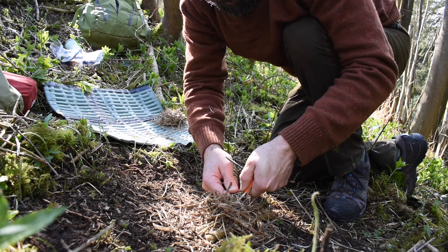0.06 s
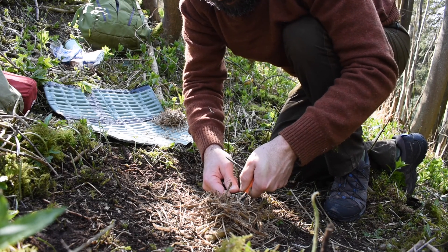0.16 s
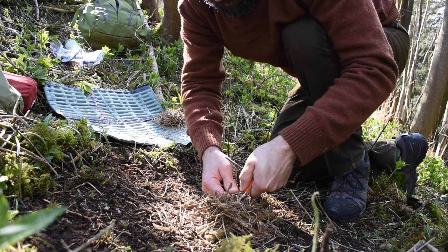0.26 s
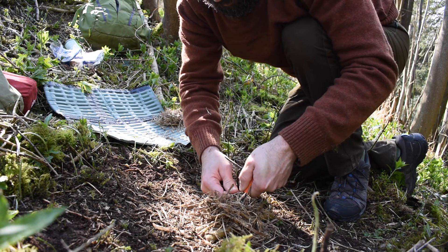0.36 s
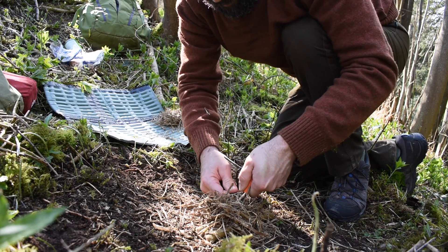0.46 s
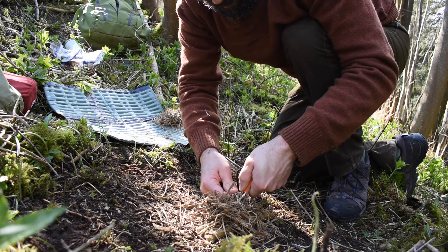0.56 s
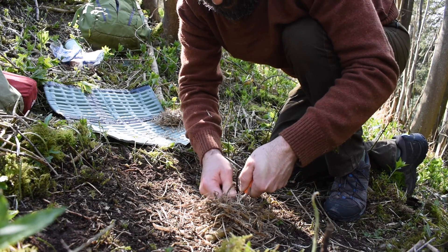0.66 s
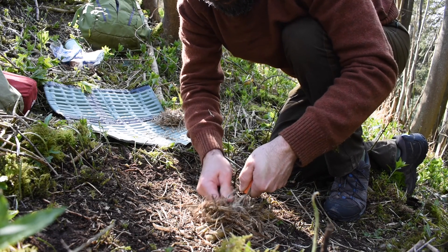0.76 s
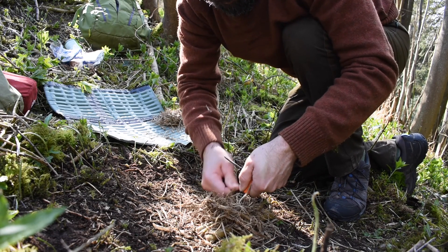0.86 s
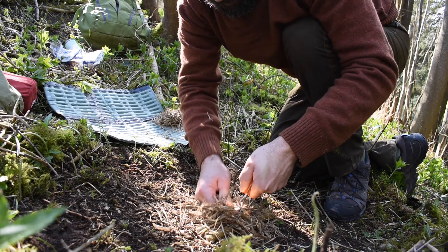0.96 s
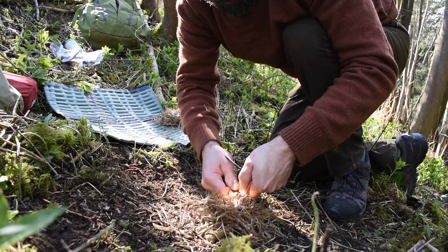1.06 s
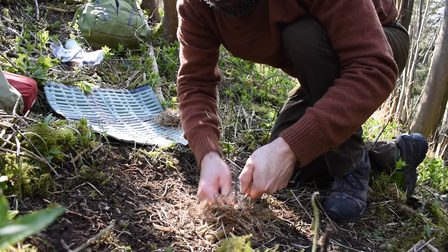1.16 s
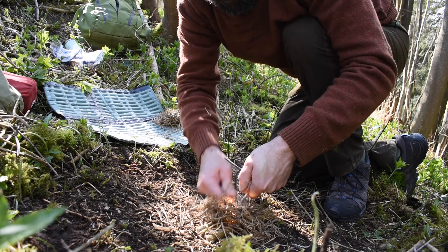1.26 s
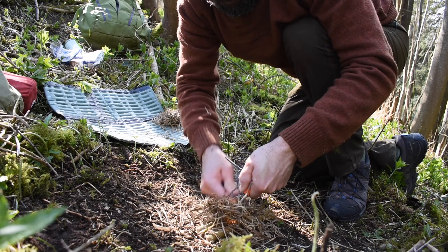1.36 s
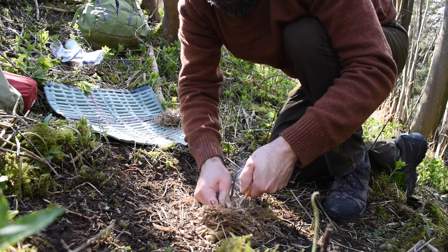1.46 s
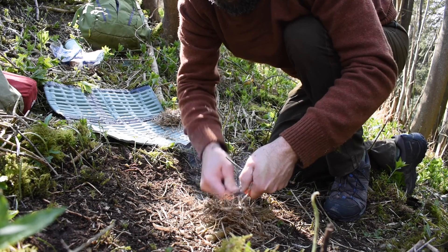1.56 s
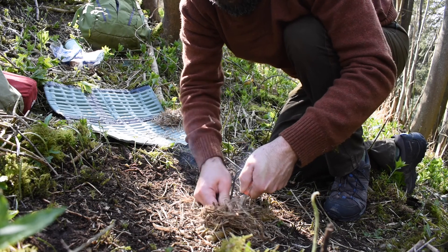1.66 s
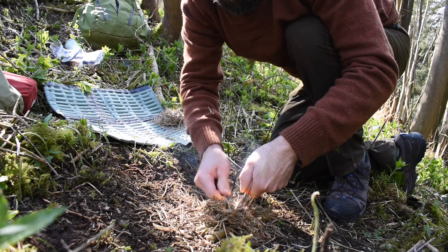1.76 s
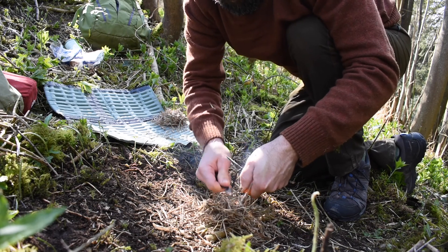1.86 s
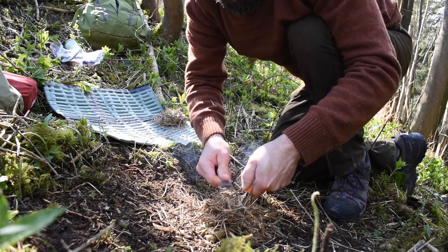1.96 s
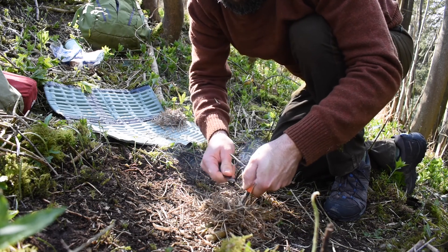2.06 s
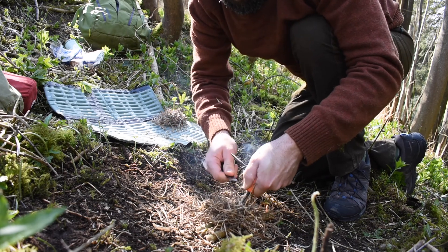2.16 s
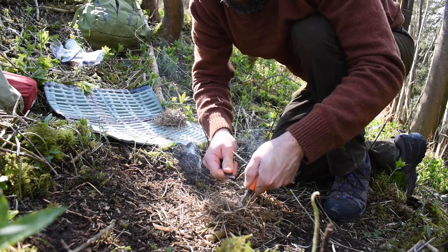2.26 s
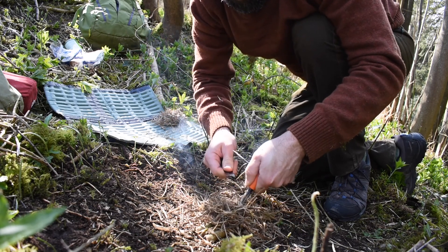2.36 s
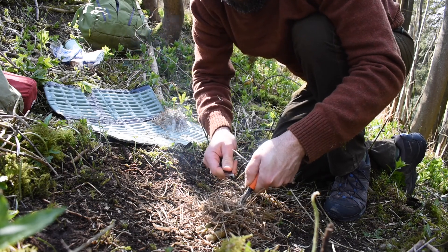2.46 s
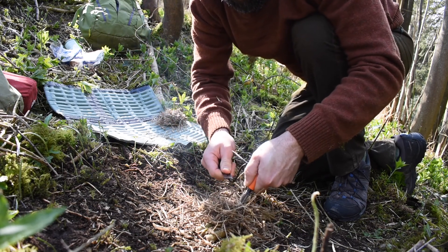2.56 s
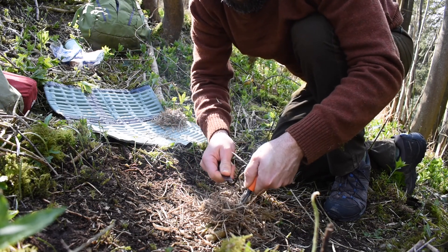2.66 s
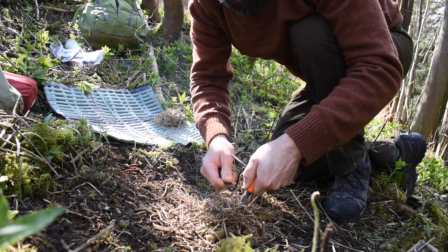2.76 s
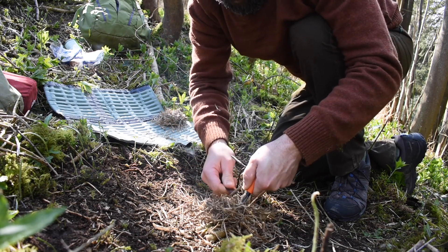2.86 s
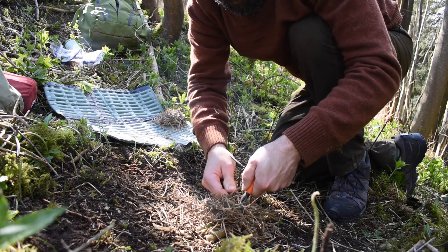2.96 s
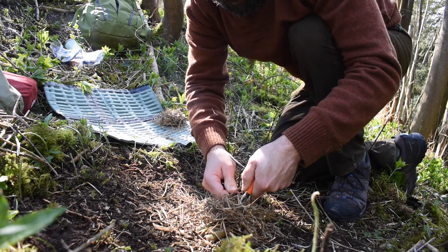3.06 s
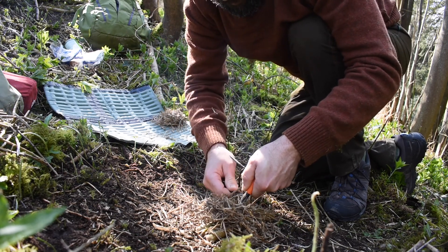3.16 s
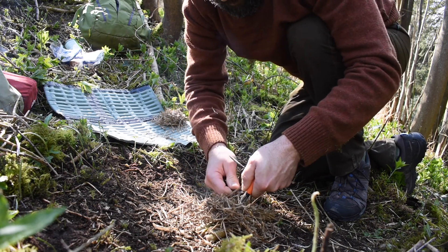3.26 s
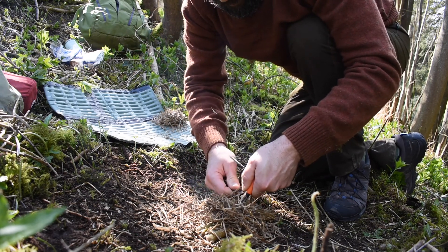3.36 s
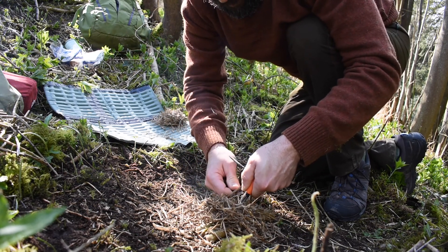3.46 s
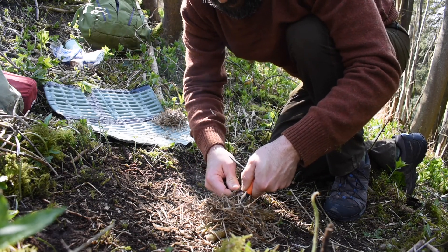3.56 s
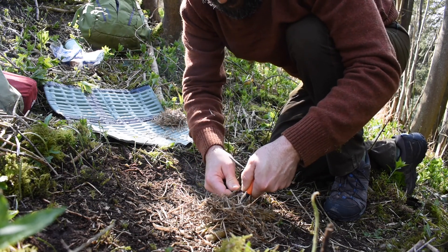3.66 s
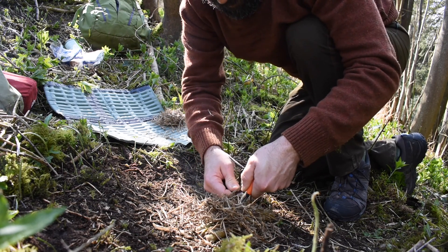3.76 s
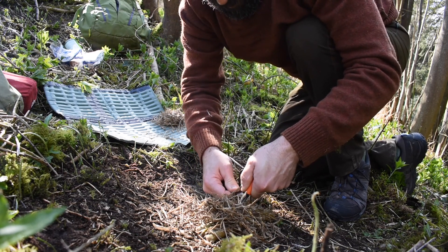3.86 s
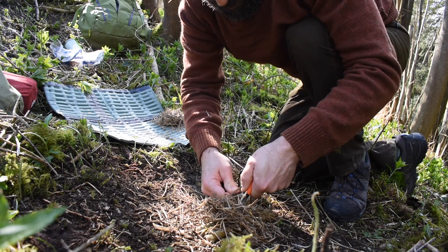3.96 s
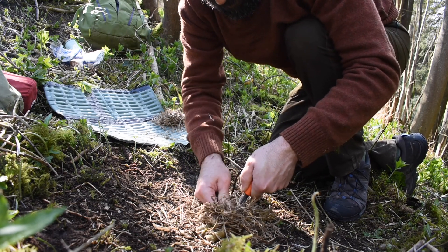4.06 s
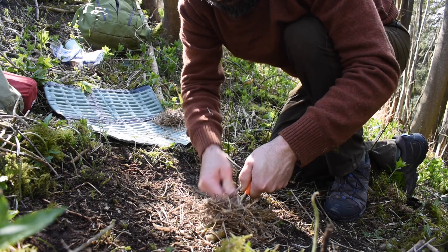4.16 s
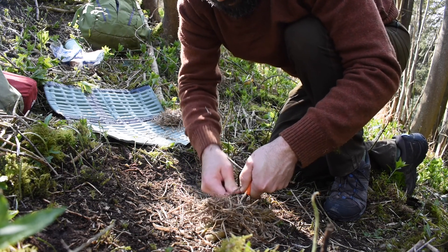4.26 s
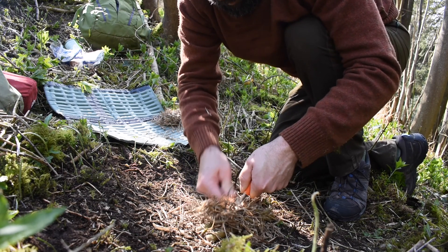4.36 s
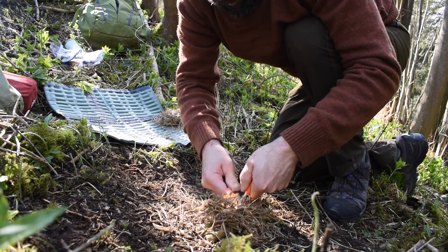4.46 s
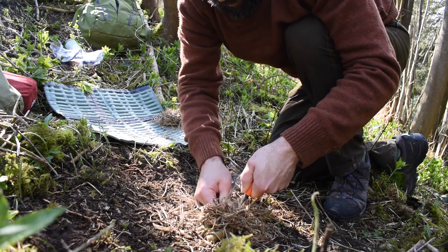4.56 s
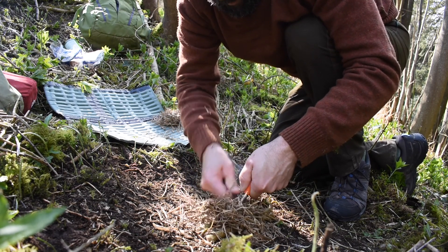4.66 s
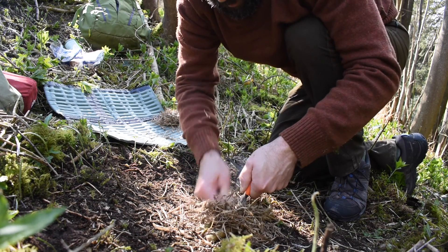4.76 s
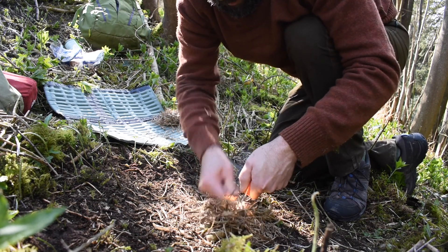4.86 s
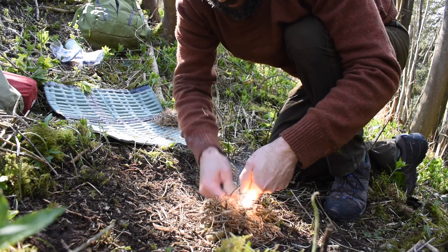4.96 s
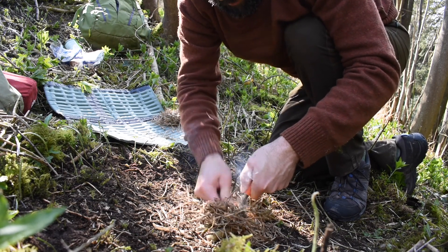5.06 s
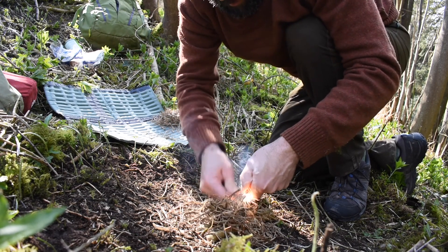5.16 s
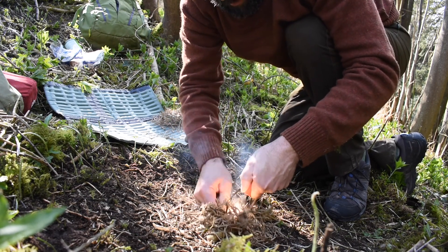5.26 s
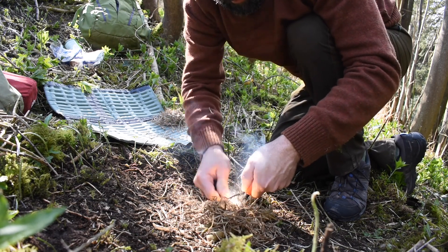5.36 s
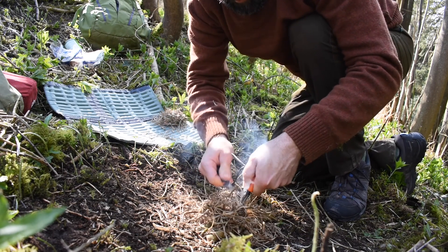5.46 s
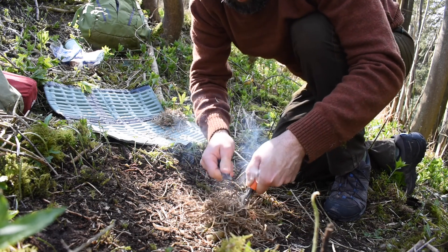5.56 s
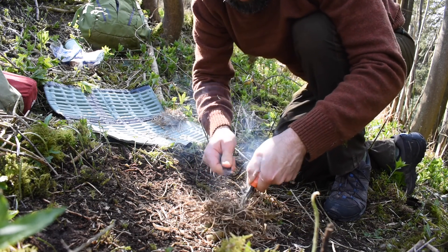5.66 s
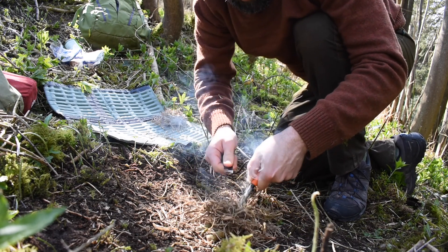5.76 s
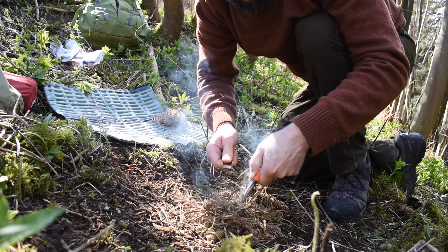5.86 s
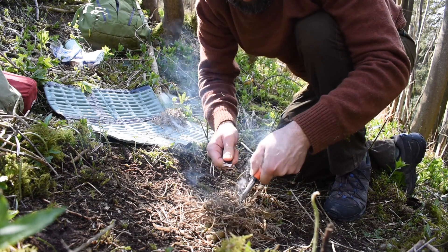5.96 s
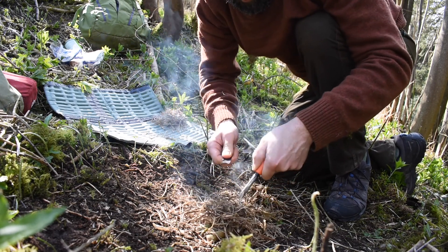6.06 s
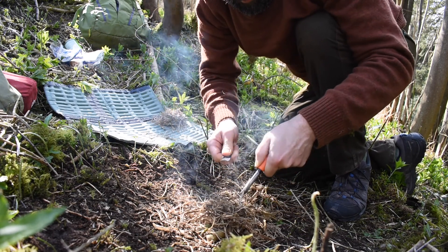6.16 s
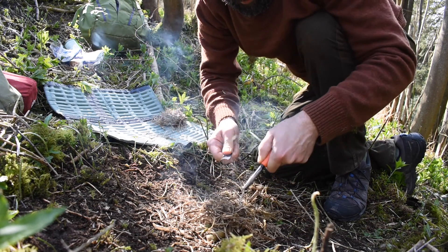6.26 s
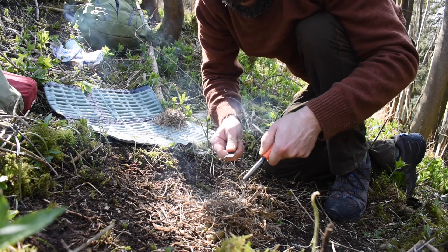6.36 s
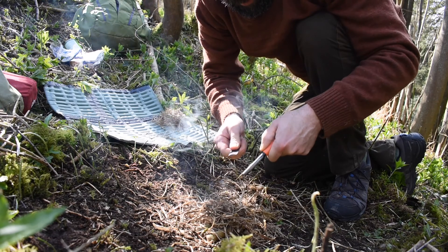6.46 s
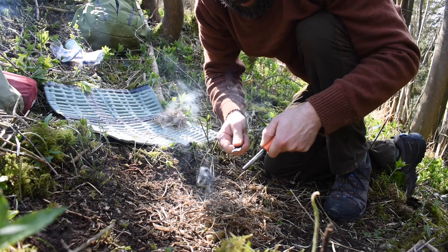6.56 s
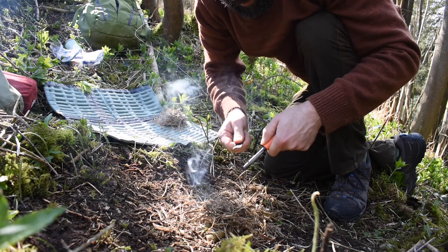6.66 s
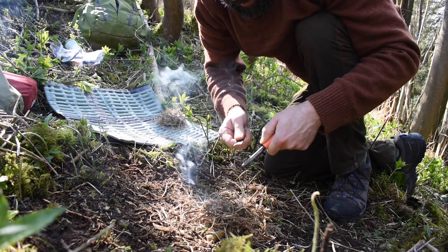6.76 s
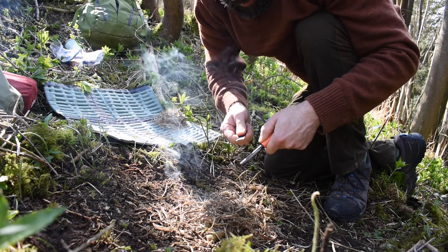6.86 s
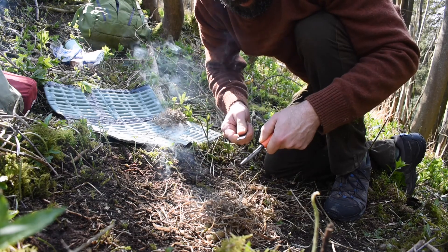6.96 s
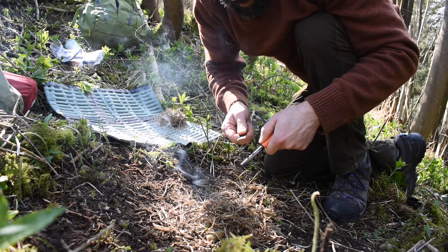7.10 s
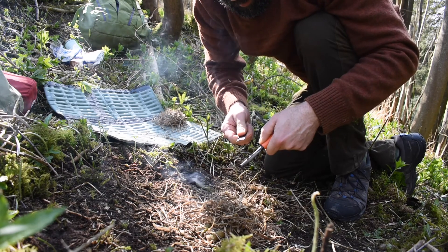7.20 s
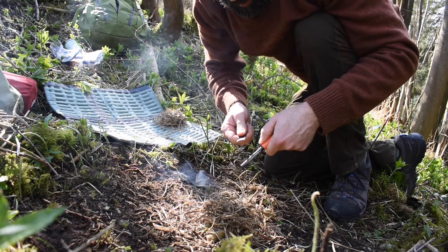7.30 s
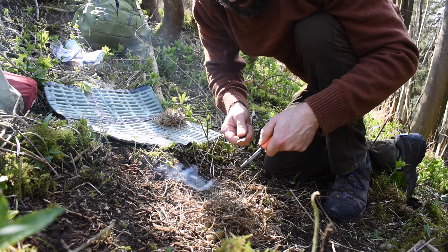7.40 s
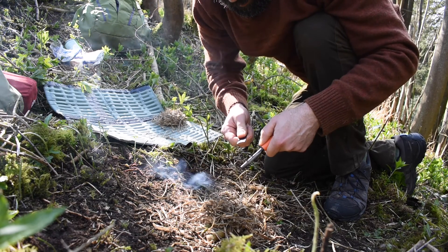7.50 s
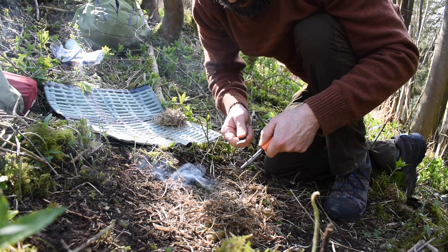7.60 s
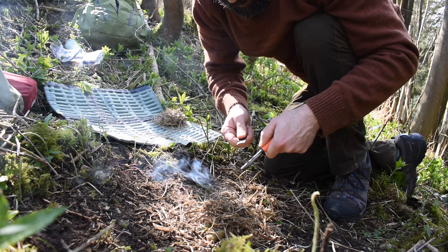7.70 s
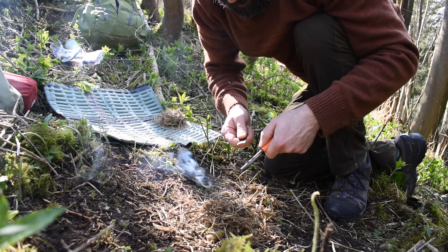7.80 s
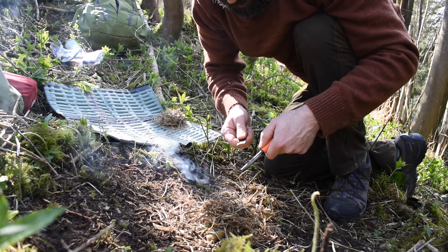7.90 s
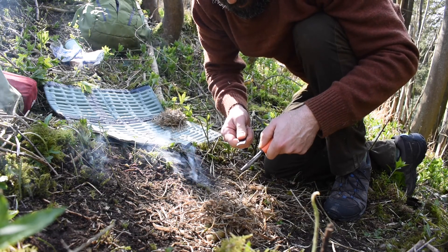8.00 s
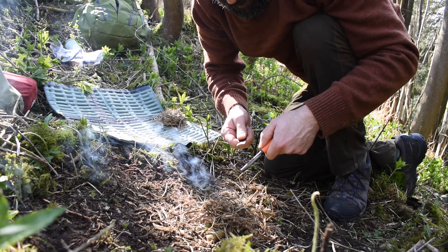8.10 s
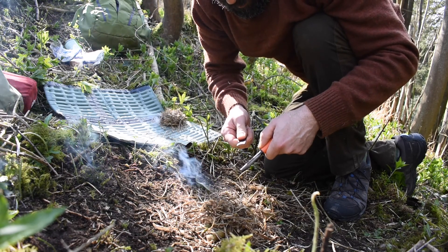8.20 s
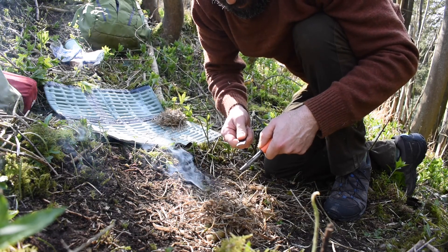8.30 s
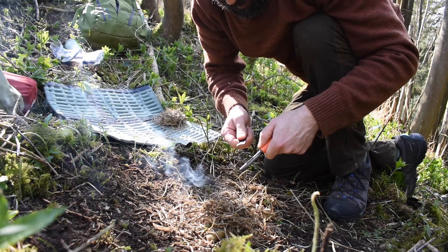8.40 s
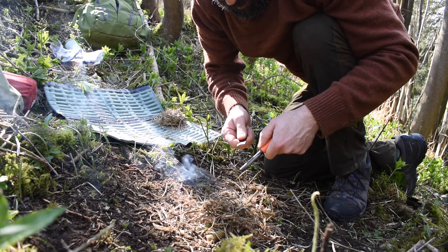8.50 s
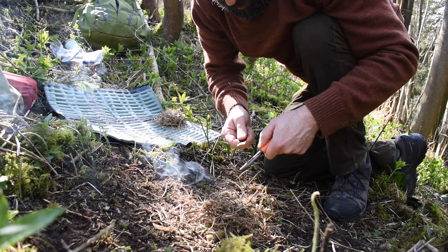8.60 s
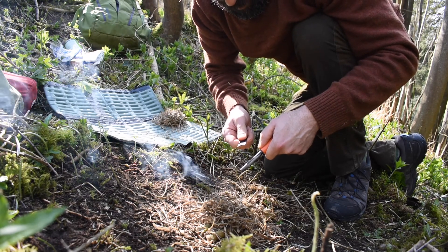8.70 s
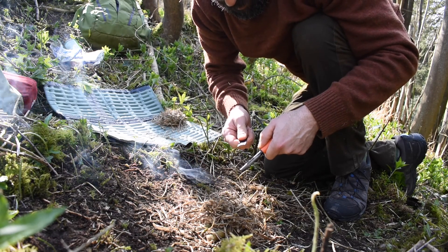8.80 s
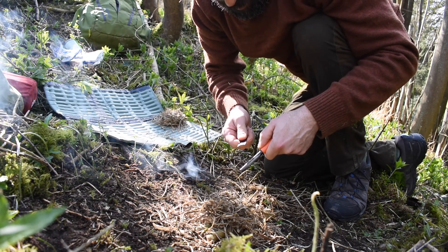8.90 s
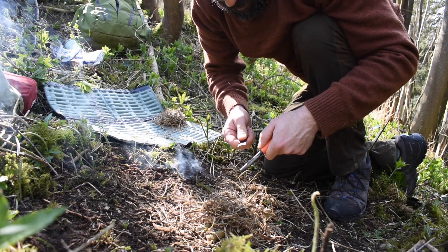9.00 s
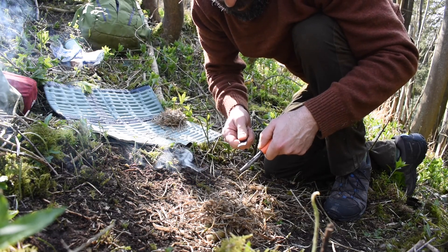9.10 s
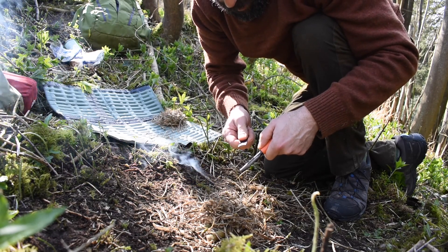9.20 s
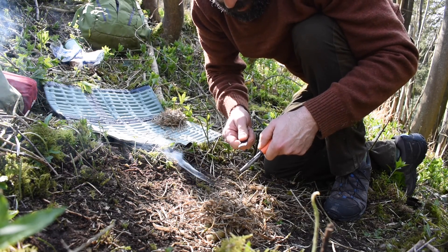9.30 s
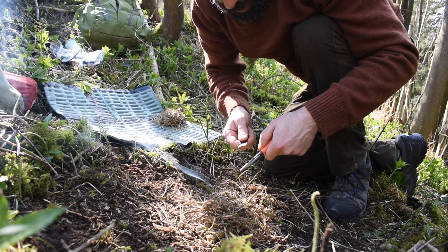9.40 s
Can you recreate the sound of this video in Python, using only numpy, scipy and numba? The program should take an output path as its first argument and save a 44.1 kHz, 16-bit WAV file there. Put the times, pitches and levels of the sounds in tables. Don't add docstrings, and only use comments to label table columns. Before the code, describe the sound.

Close, bright metal scrapes in two short bursts grind into dry grass, followed by scattered crackles and a distant bird repeating its whistled phrase.

```python
import sys
import numpy as np
from scipy import signal
from scipy.fft import rfft, irfft
from scipy.io import wavfile
from scipy.ndimage import uniform_filter1d
from numba import njit

SR = 44100
rng = np.random.default_rng(int(sys.argv[2]) if len(sys.argv) > 2 else 0)


def elevation(decibels):
    levels = np.asarray(decibels, float)
    return 10 ** (levels / 20)


def dump_mix(stems):
    frames = np.atleast_2d(stems).T
    limited = np.clip(frames, -1, 1)
    pcm = np.round(limited * 32767).astype(np.int16)
    wavfile.write(sys.argv[1], SR, pcm)


N = 416304

# [t/s, slide on bare steel/s, slide level/dB, grinding in the tinder/s, grinding level/dB]
STROKES = [
    (0.935, 0.041, -36.5, 0.063, -48),
    (1.17, 0.021, -36, 0.1305, -44),
    (1.409, 0.024, -35.5, 0.12, -44.5),
    (1.621, 0.033, -36, 0.026, -45.5),
    (4.303, 0.024, -35.5, 0.044, -46),
    (4.541, .022, -33, 0.119, -47),
    (4.757, 0.03, -36, 0.1, -45.5),
    (4.987, 0.021, -35, 0.052, -42.5),
    (5.188, 0.016, -37.5, 0.07, -41.5),
]
# [f/Hz, level/dB]
GRIT_COLOUR = [(3500, -17.5), (5000, -5.5), (7000, -2.5), (8500, -4.5), (10500, -21), (13000, -22),
               (15500, -32), (16300, -56)]


def strokes():
    s, length, rasp_db, centre_hz, low_db, high_db = np.transpose(contacts())
    clean = np.clip((rasp_db - high_db + 2.5) / 12, .05, .97)
    hollow = np.clip((high_db - low_db - 13.5) / 6, 0, .95)
    steel, body = rod(s, length, centre_hz)
    dust, high_crunch, low_crunch = tinder(high_db)
    pressure = held(elevation(rasp_db) * np.sqrt(clean), 0.0015)
    pressure = .7 * pressure + .3 * uniform_filter1d(pressure, size=900, origin=380)
    top = pressure * steel
    top += held(elevation(rasp_db + 1.5) * np.sqrt(1 - clean), 0.0065) * dust
    middle = held(elevation(high_db) * np.sqrt(1 - hollow), 0.0063) * high_crunch
    middle += held(elevation(high_db) * np.sqrt(hollow), 0.0017) * body
    bottom = held(elevation(low_db - 1.0), 0.0069) * low_crunch
    return top + middle + bottom


def rod(s, length, centre_hz):
    # [f/Hz, width/Hz, level/dB]
    tones = [(4100, 370, 2.5), (5520, 550, -1.5), (6140, 230, 1), (6540, 280, -1), (6760, 220, 4.5),
             (7640, 2700, -3.5), (8900, 340, 2), (10100, 620, -2)]
    chatter = grains(12000, spread_db=-3.0) * elevation(2.9 * drift(220))
    modes = np.zeros(N)
    for k, (hz, width_hz, level_db) in enumerate(tones):
        modes += (-1) ** k * elevation(level_db) * ring(chatter, hz, width_hz)
    centre = np.interp(np.arange(N) / SR, s + length / 2, centre_hz)
    steel = rms_one(resonate(modes, centre, 620.0, SR))
    ends = np.ravel([s, s + length], "F")
    sag = np.interp(np.arange(N) / SR, ends, np.tile([2300., 1700.], len(s)))
    body = rms_one(resonate(ring(chatter, 1950, 1100), sag, 260., SR))
    return steel, body


def tinder(high_db):
    # [f/Hz, level/dB]
    low_colour = [(60, -49), (150, -15.5), (350, -7.5), (800, 5), (1100, 3.5), (1600, -10), (16000, -46)]
    high_colour = [(900, -41), (1400, 5), (2400, 4), (3300, 2), (4200, 3), (6000, -24), (16000, -50.5)]
    busy = np.clip(held(elevation(.8 * (high_db + 49.0)), 0.0047), .12, 1)
    fibres = grains(9000 * busy, spread_db=2.0) * elevation(2.0 * drift(53)) / np.sqrt(busy)
    other_fibres = grains(7000 * busy, spread_db=1.0) * elevation(1.34 * drift(110)) / np.sqrt(busy)
    patch = resonate(fibres, 2600 + 450 * drift(8.5), 470.0, SR)
    dust = elevation(2.54 * drift(20)) * coloured(0.21 * fibres + other_fibres, GRIT_COLOUR)
    high = coloured(rms_one(fibres) + 0.2 * rms_one(patch), high_colour)
    high = elevation(1.3 * drift(25.7)) * high
    low = coloured(fibres + 0.19 * other_fibres, low_colour)
    return rms_one(dust), rms_one(high), rms_one(low)


def contacts():
    # [t/s, length/s, rasp level/dB, crunch level/dB]
    passes = [(0.068, .028, -67, -73.5), (0.65, 0.028, -47.5, -60), (0.687, .052, -37, -53.5),
              (0.738, 0.023, -50, -60), (0.753, 0.068, -61, -67.5), (0.811, .034, -47.5, -54.5),
              (0.921, 0.016, -46.5, -63), (1.068, .038, -37, -45.5), (1.108, 0.03, -46, -48),
              (1.13, 0.044, -55.5, -54.5), (4.006, 0.014, -45.5, -60), (4.018, .056, -39, -55.5),
              (4.07, 0.019, -56, -62), (4.093, 0.085, -65.5, -70.5), (4.292, 0.0073, -55, -53.5),
              (4.429, 0.043, -42.5, -46), (4.474, 0.023, -49, -52.5), (4.51, .022, -57, -64.5),
              (4.919, 0.055, -43, -48), (5.121, 0.036, -39, -43), (5.163, 0.032, -50, -62)]
    # [t/s, length/s, rasp level/dB, body level/dB]
    lifted = [
        (0.14, .019, -69, -65.5),
        (0.844, 0.027, -48, -46.5),
        (4.173, 0.049, -43.5, -50.5),
    ]
    # [t/s, length/s, hiss level/dB, crunch level/dB]
    rustles = [(1.738, 0.14, -47.5, -48.5), (1.888, 0.025, -54, -56.5), (1.917, 0.067, -64, -67),
               (1.975, .055, -69, -69), (2.12, 0.0095, -53.5, -45), (2.139, 0.022, -70, -68.5),
               (2.208, 0.0063, -58, -52), (2.224, 0.057, -76, -69), (5.287, 0.023, -38.5, -41),
               (5.362, 0.065, -47, -51), (5.433, .12, -65, -60.5), (5.649, 0.027, -52, -59),
               (5.678, 0.0092, -47, -43), (5.691, 0.0083, -53, -56.5), (5.924, 0.01, -37.5, -52),
               (5.941, 0.026, -70, -69), (6.13, 0.028, -59, -69), (6.17, 0.0065, -32, -38),
               (6.38, .019, -55, -57.5), (6.41, 0.021, -56, -59), (6.447, 0.019, -55, -56),
               (6.472, 0.041, -67, -69), (6.568, 0.0041, -58, -55), (6.705, .01, -46, -57),
               (6.824, 0.044, -57.5, -59.5), (7.89, 0.045, -51, -60), (9.031, 0.0036, -35.5, -58),
               (9.038, .022, -64, -65), (9.06, 0.043, -45, -51.5), (9.119, 0.11, -72, -63.5)]
    rows = []
    for table, hz, low_db in [(passes, 6210, -9.5), (lifted, 6210, -17.0), (rustles, 7000, -6.5)]:
        for s, length, level, crunch in table:
            rows.append((s, length, level, hz, crunch + low_db, crunch))
    landing_s, landing_db = 0.024, -1.5
    lift_s, lift_db = 0.053, -12
    grind_low_db = -8.0
    for s, slide, level, grind, rub in STROKES:
        land = s + slide + landing_s
        lift = rub + lift_db
        rows += [(s, slide, level, 5550, level - 25.5, level - 16.0),
                 (s + slide, landing_s, level + landing_db, 6500, level - 14, level - 7.5),
                 (land, grind, rub, 7200, rub + grind_low_db, rub),
                 (land + grind, lift_s, lift, 6600, lift + grind_low_db, lift)]
    return sorted(rows)


def held(values, ease_s):
    out = np.zeros(N)
    for (s, length, *_), value in zip(contacts(), values):
        out[round(s * SR):round((s + length) * SR)] = value
    r = np.exp(-1 / (ease_s * SR))
    fading = signal.lfilter([1 - r], [1, -r], out)
    return np.maximum(uniform_filter1d(out, size=100), fading)


def snaps():
    # [t/s, peak level/dB, low part against it/dB]
    snags = [(0.668, -34, -20), (0.6733, -32, -27), (0.8742, -15.5, -44), (1.0, -20, -25),
             (1.1023, -11.5, -18), (1.123, -14, -21), (1.1369, -24, -5), (1.1652, -19, -16),
             (1.4424, -15, -14), (1.5227, -20, -17), (1.542, -17, -19), (1.58, -19.5, -35),
             (1.6618, -22, -15), (1.7514, -22.5, -24), (1.8205, -24, -10), (1.881, -19, -19),
             (4.4461, -17.5, -14), (4.4527, -18.5, -13), (4.671, -28.5, -35), (4.8661, -19.5, -11),
             (4.8798, -18.5, -33), (4.9305, -20, -17), (4.9623, -24, -10), (5.052, -21, -4),
             (5.139, -20, -34), (5.1487, -10, -31), (5.1949, -15, -17), (5.2655, -21, -3.5),
             (5.3657, -24.5, -7.5), (5.4762, -26.5, -16)]
    # [t/s, peak level/dB, low part against it/dB]
    pops = [(1.9498, -31.5, -12), (2.121, -31, -8), (2.1393, -33, -24), (2.211, -29.5, -36),
            (2.8293, -25, -37), (2.8873, -26.5, -28), (3.138, -32.5, -14), (5.1814, -30.5, 8),
            (5.5307, -32.5, -3), (5.6524, -23.5, -37), (5.6853, -28, -34), (5.6904, -14.5, -13.5),
            (5.7263, -29, -10), (5.9231, -28, -18), (5.9304, -16, -35), (6.1397, -28.5, -9.5),
            (6.1485, -30, -11), (6.171, -42, -21), (6.1793, -16.5, -17), (6.5707, -28.5, -8),
            (6.7092, -35, -12), (7.887, -17.5, -4), (7.8947, -24, -13), (7.9064, -14, -17),
            (7.9275, -26, -12), (8.486, -36.5, -20), (9.0331, -20, -18), (9.0598, -24, -15.5),
            (9.0794, -23.5, -32), (9.1007, -29, -32)]
    # [t/s, peak level/dB]
    crackles = [(0.142, -48), (0.654, -43), (1.4027, -29), (2.258, -38), (2.267, -39), (3.147, -43),
                (3.1665, -47), (3.2858, -49), (3.3223, -40), (3.951, -49), (4.43, -35), (4.536, -26.5),
                (4.6492, -23.5), (5.86, -43), (5.872, -41), (6.133, -37), (6.381, -45), (6.391, -38.5),
                (6.4488, -33), (6.4604, -35), (6.574, -36), (6.8504, -29), (6.8653, -45), (7.994, -35),
                (9.0933, -43), (9.107, -42), (9.125, -41), (9.1407, -38), (9.1562, -37), (9.288, -44)]
    # [f/Hz, level/dB]
    crack_colour = [(100, -53.5), (500, -16.5), (2000, 1.5), (3500, -3), (6500, 2), (9000, -1.5),
                    (12000, -20.5), (16000, -24)]
    rows = list(snags) + list(pops) + [(s, level, -9.5) for s, level in crackles]
    cracks, pushes = np.zeros((2, N + 2000))
    age = np.arange(1000) / SR
    for k, (s, peak_db, low_db) in enumerate(rows):
        spray = rng.standard_normal(1000)
        burst = 0.29 * spray * elevation(-60 * age / 0.011)
        burst[0] = np.sign(spray[0]) * 1.49
        if k < len(snags):
            burst = signal.lfilter(*signal.butter(2, 9000, fs=SR), burst)
        pitch_hz = 4500 + 4500 * rng.random()
        at = round(s * SR)
        cracks[at:at + 1000] += elevation(peak_db) * (burst + 0.56 * ring(burst, pitch_hz, 1200))
        pushes[at:at + 1000] += elevation(peak_db + low_db) * burst * elevation(-60 * age / 0.0046)
    band = signal.butter(3, [440, 2400], "band", fs=SR, output="sos")
    thud = signal.sosfilt(band, pushes)
    return (elevation(3.0) * coloured(cracks, crack_colour) + elevation(13.5) * thud)[:N]


def thumps():
    hz, width_hz = 72, 23
    knocks = np.zeros(N)
    for s, slide, level, *_ in STROKES:
        knocks[round((s + slide) * SR)] = elevation(level + 15.5)
    return ring(ring(knocks, hz, width_hz), hz, width_hz)


def settling():
    # [t/s, level/dB]
    litter_level = [(0, -85), (.5, -78.5), (2.0, -74), (2.6, -81.5), (3.0, -70), (3.4, -97), (3.95, -72),
                    (5.6, -65.5), (5.9, -81), (7, -96), (9.0, -94), (9.25, -73.5), (9.44, -88)]
    ticks = grains(1100 * elevation(5.0 * drift(8)), spread_db=2.5)
    return elevation(in_time(litter_level)) * rms_one(coloured(ticks, GRIT_COLOUR))


def off_ground(x):
    x = signal.sosfilt(signal.butter(3, 120, "high", fs=SR, output="sos"), x)
    return x - .85 * ring(x, 1170, 200)


def boot():
    # [t/s, length/s, start f/Hz, end f/Hz, level/dB]
    squeaks = [
        (2.787, .024, 1300, 950, -64),
        (9.062, .035, 1350, 1080, -60),
    ]
    return glides(squeaks, octave_db=4.0, wobble_hz=15)


def bird():
    x = elevation(6.0) * glides(song(), octave_db=-53, wobble_hz=12.0)
    return (elevation(-2) * x + among_trees(x)) * elevation(2.0 * drift(45))


def song():
    # [t/s, low note f/Hz, high note f/Hz, last note after/s, level/dB]
    phrases = [
        (5.52, 3550, 5200, .26, -72),
        (6.05, 3486, 5250, .24, -70.5),
        (6.58, 3487, 4960, 0.29, -71.5),
        (7.1, 3500, 5150, 0.23, -70.5),
        (7.64, 3440, 4900, .26, -71),
        (8.18, 3457, 5200, 0.2, -74),
        (8.68, 3470, 4960, 0.23, -74.5),
    ]
    notes = []
    for k, (s, low, high, last, level) in enumerate(phrases):
        first_db = level - 5 * (k == 0)
        # (start s, length s, start Hz, end Hz, dB)
        notes += [(s, .2, low, low * .992, first_db),
                  (s + .155, .08, 5560, 5560 * .965, level - 8.0),
                  (s + .195, .12, high, high * .98, level - 3.0),
                  (s + last, .16, 4350, 4350 * .988, level)]
    return notes


def glides(notes, octave_db, wobble_hz):
    out = np.zeros(N)
    wobble = wobble_hz * drift(58)
    for s, length, start_hz, end_hz, level_db in notes:
        u = np.linspace(0, 1, round(length * SR))
        at = round(s * SR)
        hz = end_hz + (start_hz - end_hz) * (1 - u) ** 1.3 + wobble[at:at + len(u)]
        phase = 2 * np.pi * np.cumsum(hz) / SR
        shape = np.minimum(u / 0.082, 1) * (1 - u) ** 0.41
        tone = np.sin(phase) + elevation(octave_db) * np.sin(2 * phase)
        out[at:at + len(u)] += elevation(level_db) * shape * tone
    return out


def among_trees(x):
    age = np.arange(SR // 2) / SR
    tail = rng.standard_normal(len(age)) * elevation(-60 * age / .75)
    return signal.fftconvolve(x, tail / np.sqrt(np.sum(tail ** 2)))[:N]


def woodland():
    # [f/Hz, level/dB]
    air_colour = [(20, -7), (45, -18), (70, -14), (150, -5.5), (290, -1), (500, -2.5), (1000, -2),
                  (3400, -7.5), (6500, -15), (8000, -19), (16000, -25)]
    # [t/s, level/dB]
    air_level = [(0.0, -68.5), (1.02, -67.5), (3.76, -69), (5.1, -62), (5.89, -68.5), (9.44, -68)]
    hush = coloured(rng.standard_normal(N + SR), air_colour)[SR:]
    return rms_one(hush) * elevation(in_time(air_level))


def far_engine():
    # [t/s, level/dB]
    hum_level = [(0.0, -76), (1.79, -96), (2.0, -82), (3.34, -94), (3.81, -82), (4.78, -94), (5.05, -74.5),
                 (6.52, -82.5), (8.62, -81.5), (8.88, -95), (9.44, -80)]
    # [t/s, f/Hz]
    hum_pitch = [(0, 86), (3.5, 87), (5.0, 91), (6.5, 94), (9.44, 95)]
    phase = 2 * np.pi * np.cumsum(in_time(hum_pitch) + .6 * drift(1)) / SR
    hum = np.sin(phase) * elevation(1.5 * drift(3))
    return rms_one(hum) * elevation(in_time(hum_level) - 7.0)


def rms_one(x):
    return x / np.sqrt(np.mean(x ** 2) + 1e-20)


def in_time(rows):
    return np.interp(np.arange(N) / SR, *np.transpose(rows))


def coloured(x, spectrum):
    hz, level_db = np.transpose(spectrum)
    grid = np.arange(1, 4098) * SR / 8194
    cepstrum = irfft(np.log(elevation(np.interp(np.log(grid), np.log(hz), level_db))))
    cepstrum[1:4096] *= 2
    cepstrum[4097:] = 0
    return signal.fftconvolve(x, irfft(np.exp(rfft(cepstrum))))[:len(x)]


def drift(rate):
    r = np.exp(-2 * np.pi * rate / SR)
    noise = rng.standard_normal(N + SR)
    return rms_one(signal.lfilter([1], [1, -2 * r, r * r], noise)[SR:])


def grains(per_s, spread_db):
    sizes = elevation(spread_db * np.minimum(rng.exponential(1, N), 5)) * rng.standard_normal(N)
    return sizes * (rng.random(N) < per_s / SR)


def ring(x, hz, width_hz):
    return signal.lfilter(*signal.iirpeak(hz, hz / width_hz, fs=SR), x)


@njit
def resonate(x, hz, width_hz, sr):
    out = np.zeros(len(x))
    r = np.exp(-np.pi * width_hz / sr)
    for i in range(2, len(x)):
        turn = 2 * r * np.cos(2 * np.pi * hz[i] / sr)
        out[i] = x[i] - x[i - 2] + turn * out[i - 1] - r * r * out[i - 2]
    return out


def scene():
    near = off_ground(strokes() + snaps() + settling())
    echo = among_trees(elevation(-27.0) * near)
    mix = near + echo + thumps() + boot() + bird() + woodland() + far_engine()
    return mix[None]


def roll_off(x):
    return signal.sosfilt(signal.butter(12, 16600, fs=SR, output="sos"), x)


def record(dry):
    top = signal.cheby2(10, 50, 16700, fs=SR, output="sos")
    return roll_off(signal.sosfilt(top, dry))


dry = scene()
out = record(dry)
dump_mix(out)
```